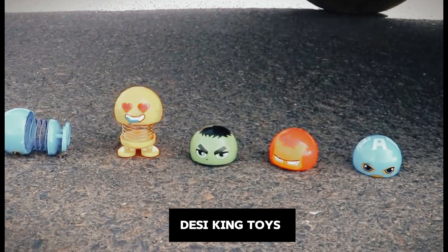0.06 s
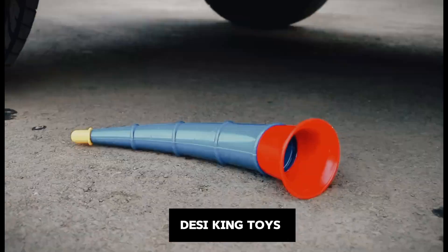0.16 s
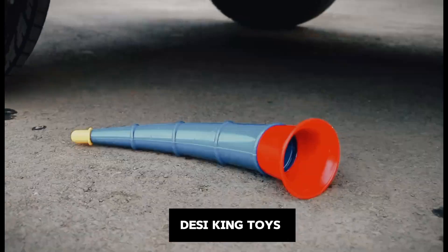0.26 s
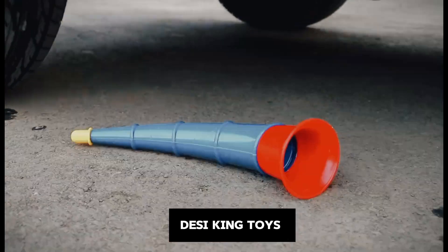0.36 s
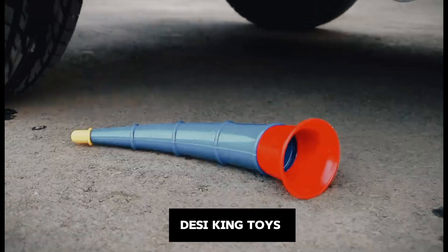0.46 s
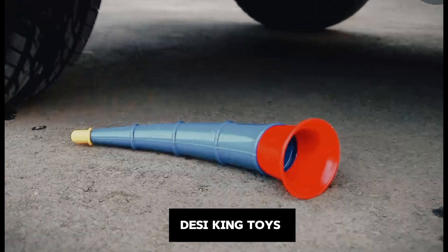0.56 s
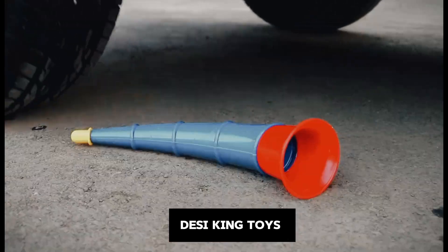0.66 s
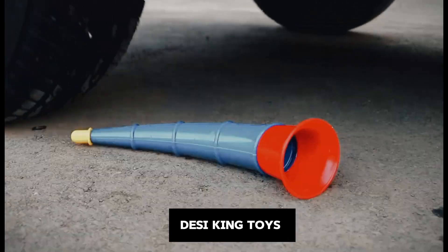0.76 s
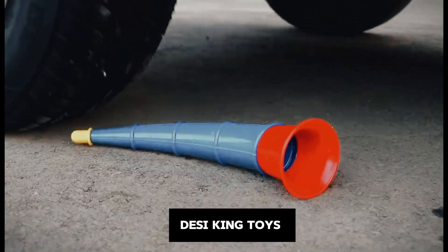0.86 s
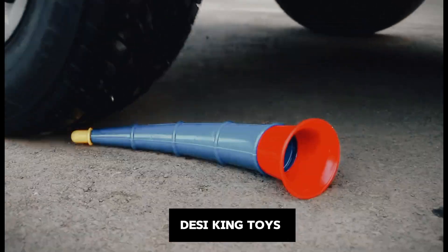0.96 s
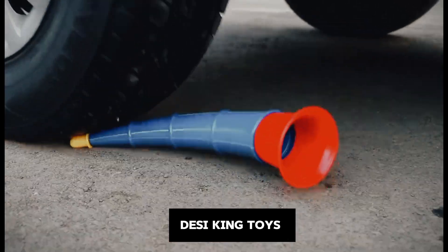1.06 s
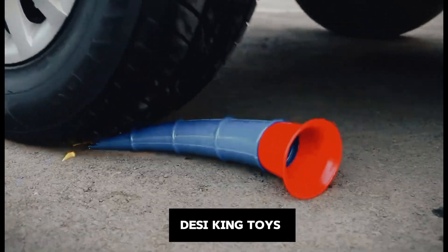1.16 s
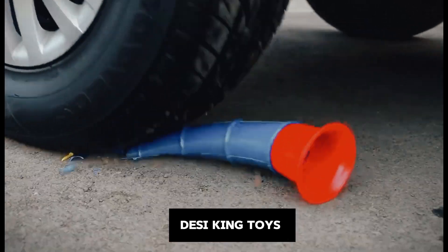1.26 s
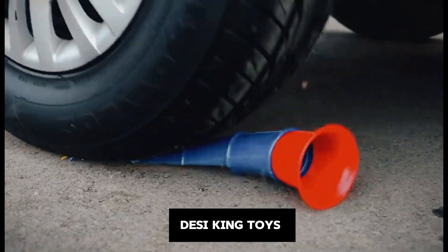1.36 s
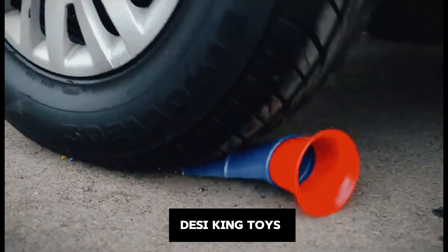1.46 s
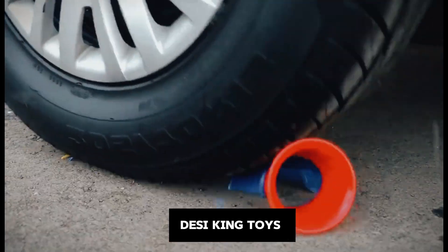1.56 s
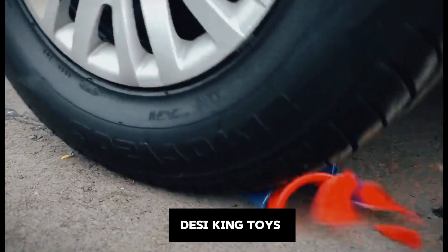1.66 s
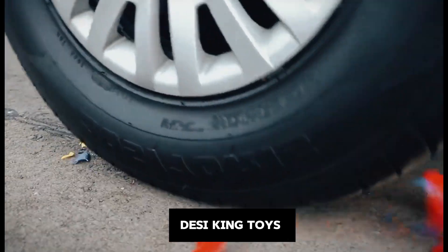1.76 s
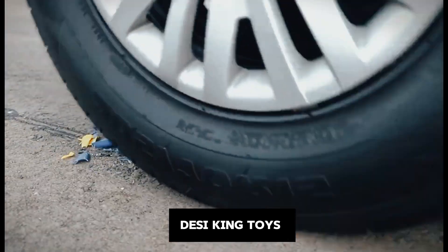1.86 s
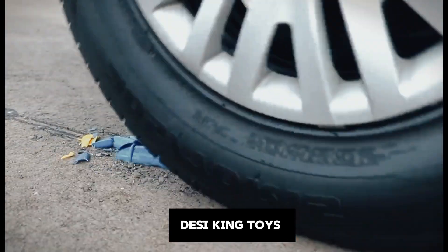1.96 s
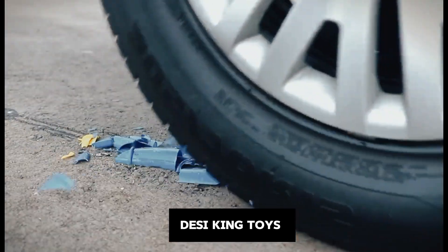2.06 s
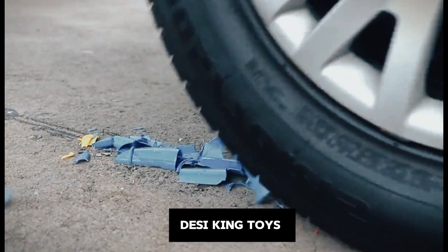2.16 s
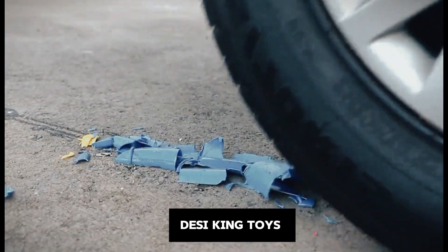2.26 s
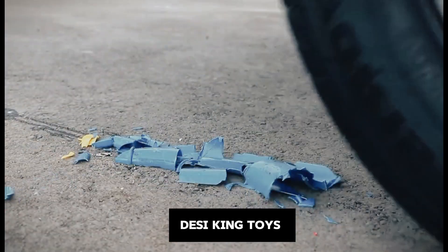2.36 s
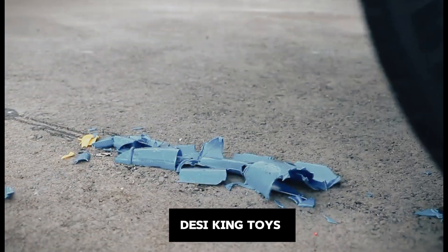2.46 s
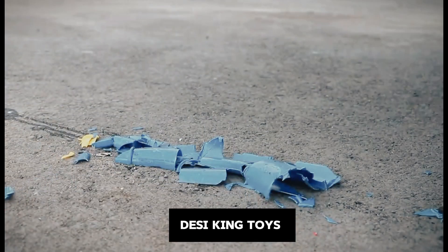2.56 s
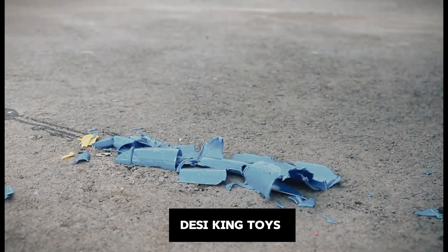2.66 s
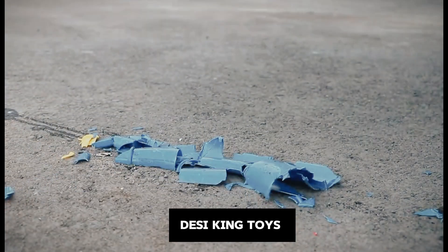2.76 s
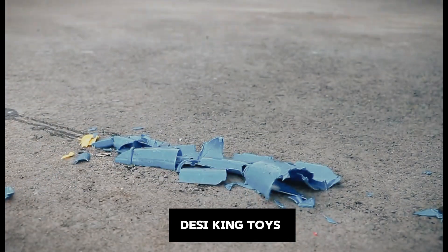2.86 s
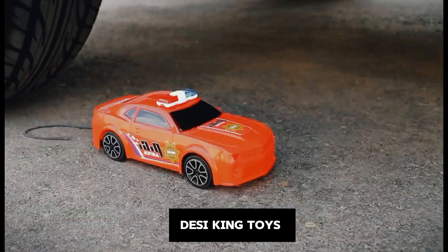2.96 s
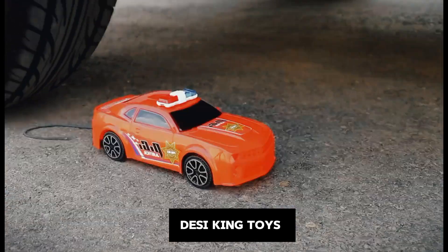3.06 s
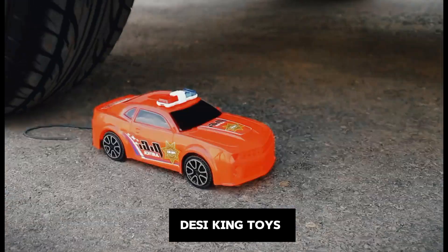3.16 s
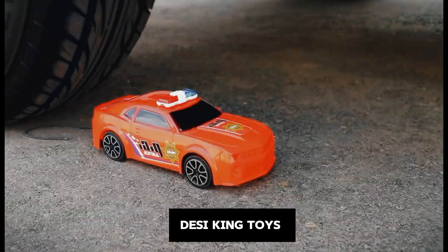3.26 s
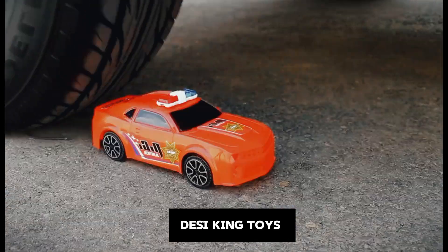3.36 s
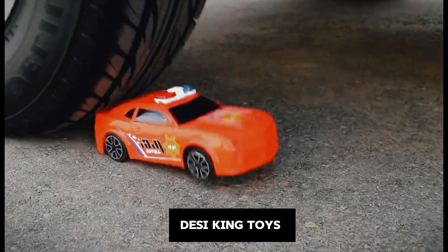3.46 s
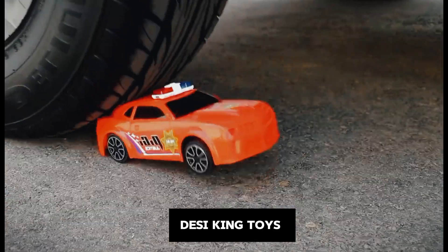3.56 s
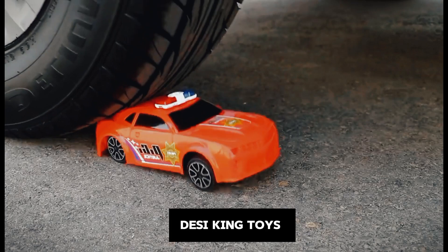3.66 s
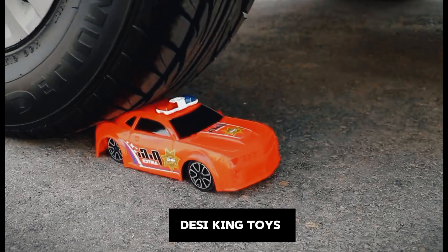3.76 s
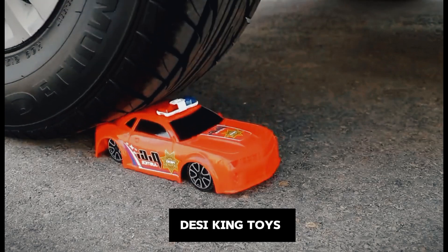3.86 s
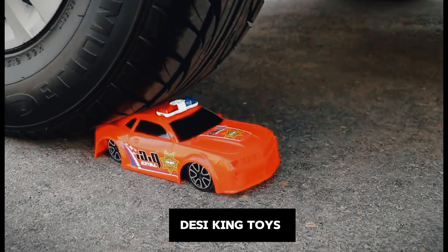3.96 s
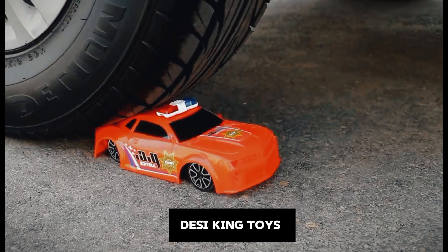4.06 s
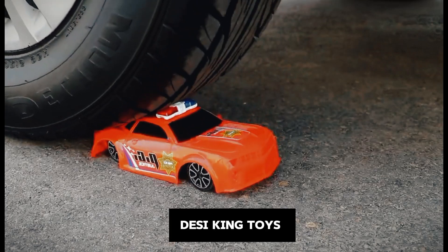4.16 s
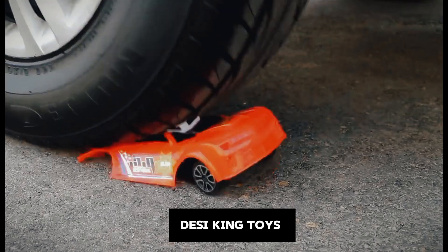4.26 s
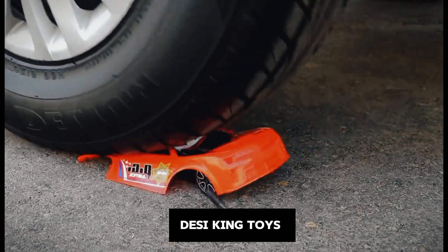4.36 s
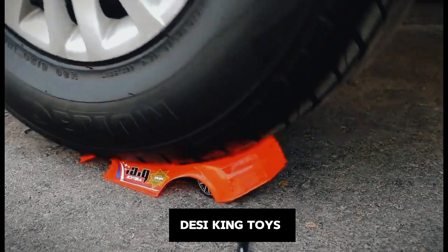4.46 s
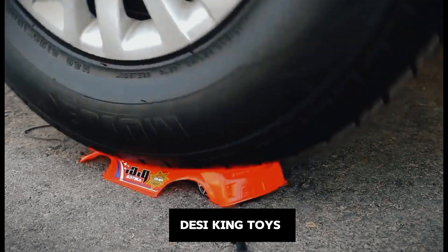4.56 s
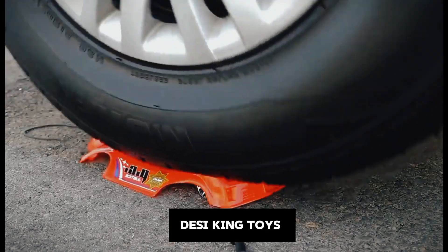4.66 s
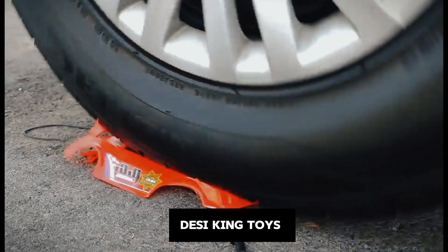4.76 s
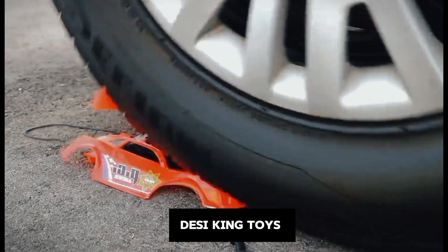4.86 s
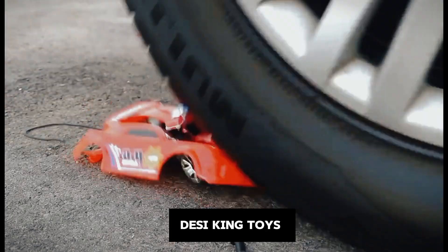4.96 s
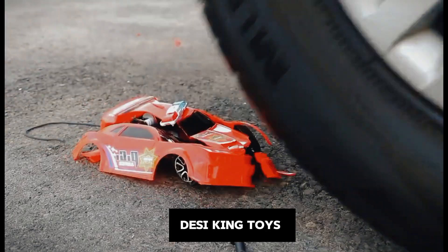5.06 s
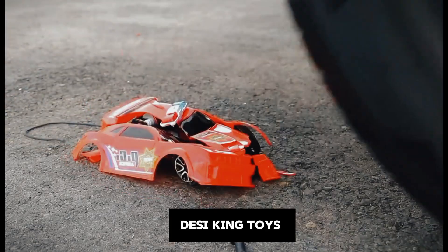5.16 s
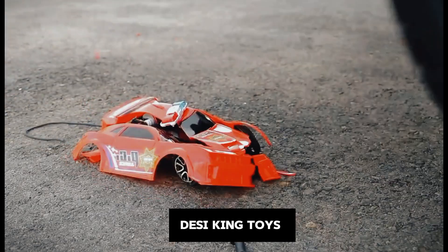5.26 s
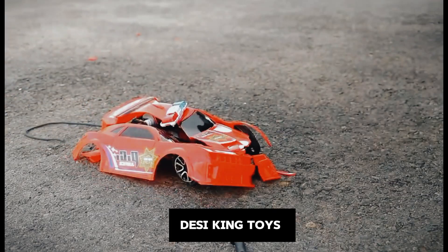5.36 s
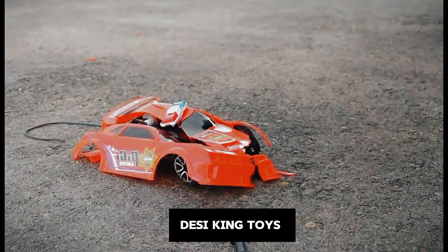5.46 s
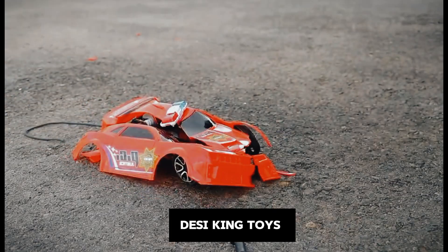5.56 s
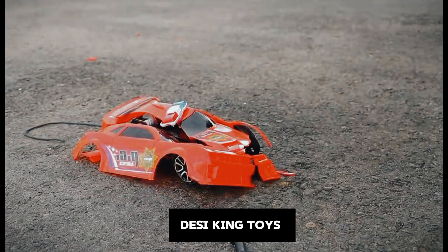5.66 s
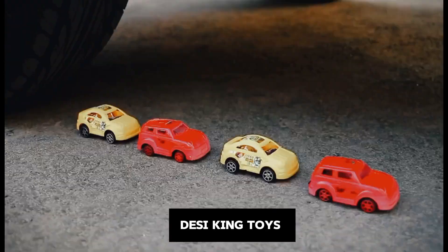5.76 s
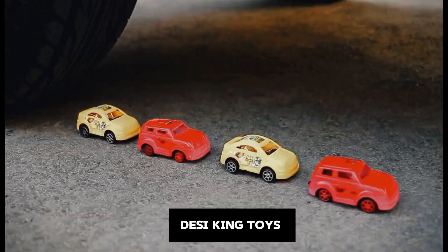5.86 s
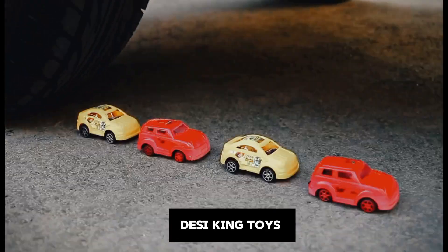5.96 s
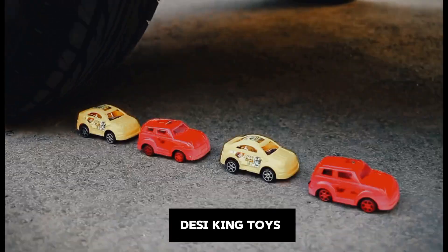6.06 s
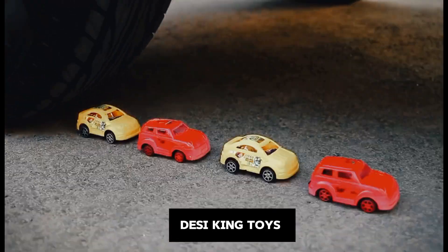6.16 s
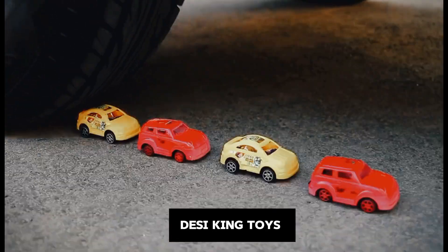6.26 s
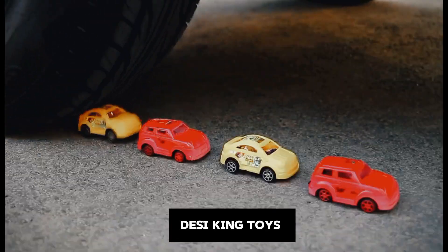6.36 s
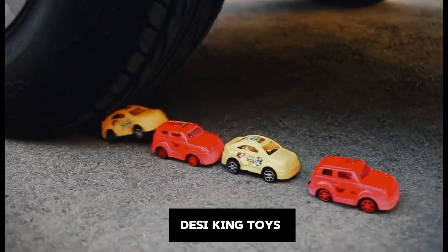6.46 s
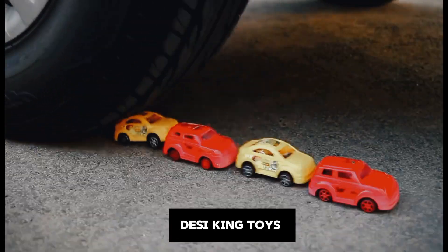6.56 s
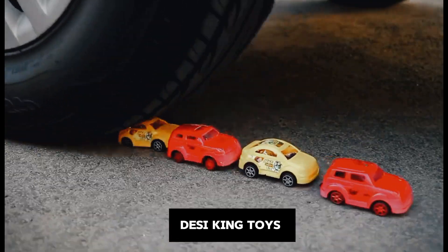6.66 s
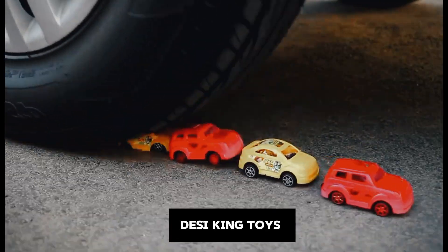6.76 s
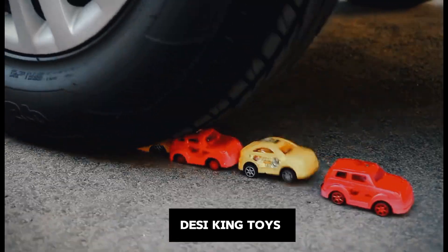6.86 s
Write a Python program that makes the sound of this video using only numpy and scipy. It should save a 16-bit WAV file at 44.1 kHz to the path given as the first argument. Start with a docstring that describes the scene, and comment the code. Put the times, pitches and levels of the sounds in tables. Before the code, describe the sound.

Close to the microphone, a car tyre rolls over plastic toys. A fading echo of an earlier crush comes first, then a hollow horn shatters in a dense crackling volley. A toy car creaks, buckles and caves in with darker crunches. After a quiet gap, small cars scrape and crack. The engine idles softly, with long, wide reverberation.

```python
"""A car tyre rolls over hollow plastic toys, close to the microphone: a horn shatters, a toy car creaks
and caves in, a small car cracks. Each break is a volley of tiny fractures ringing shell, splinters and ground.
Panels buckle with brief notes, low thuds and a rumble come from the tyre, and the engine idles softly below.
The close sounds sit in the centre with a long, wide reverberation around them; at the start the
reverberation of an earlier crush is still dying away."""
import sys
import numpy as np
from scipy import signal
from scipy.fft import rfft, irfft, next_fast_len
from scipy.io import wavfile
from scipy.ndimage import uniform_filter1d, map_coordinates

SR = 44100
rng = np.random.default_rng(int(sys.argv[2]) if len(sys.argv) > 2 else 0)


def transcribe(signal):
    """Save signal, clipped to [-1, 1], as a 16-bit WAV file at the path in sys.argv[1]."""
    frames = np.atleast_2d(signal).T
    limited = np.clip(frames, -1, 1)
    pcm = np.round(limited * 32767).astype(np.int16)
    wavfile.write(sys.argv[1], SR, pcm)


N = 304731  # samples

# Loudest single breaks, levels before the common gain in snaps():
# [t/s, length/s, shell f/Hz, shell level/dB, splinter f/Hz, splinter level/dB]
SNAP_EVENTS = [(1.2367, 0.025, 1510, -14.5, 5400, -11.5), (1.325, 0.0045, 911, -25, 5190, -16),
               (1.3555, 0.04, 750, -16, 5740, -14.5), (1.423, 0.013, 1370, -12, 2225, -27),
               (1.448, 0.027, 1493, -19.5, 2190, -15.5), (1.533, 0.013, 1188, -17, 5490, -15),
               (1.561, 0.0097, 1070, -16, 4680, -13.5), (1.6, .012, 1290, -18, 5500, -10.5),
               (1.682, 0.02, 374, -24, 5610, -12), (1.8188, 0.0045, 1196, -11.5, 4370, -12.5),
               (1.8247, 0.0038, 1478, -20, 5600, -10), (1.832, 0.012, 940, -18, 4930, -12),
               (1.874, 0.011, 1000, -18.5, 6600, -12.5), (1.888, .005, 740, -17, 5150, -17.5),
               (1.914, 0.0081, 730, -20.5, 4710, -15.5), (1.922, 0.0042, 810, -13.5, 5010, -13.5),
               (1.94, .0027, 714, -18, 5290, -14.5), (1.9684, 0.0046, 810, -18, 3900, -15),
               (2.0897, 0.0077, 1400, -26.5, 3530, -17.5), (2.135, 0.017, 770, -18.5, 5840, -17),
               (2.188, 0.0045, 777, -14, 5600, -16), (2.261, 0.0097, 890, -19, 2300, -16.5),
               (2.2855, 0.0023, 734, -24, 3380, -13.5), (2.301, 0.0072, 652, -17.5, 3920, -9.5),
               (2.315, 0.0032, 690, -16.5, 4760, -16), (2.351, .003, 1160, -34, 3800, -27),
               (2.8252, 0.0016, 770, -12, 8600, -11), (2.8903, .008, 894, -15, 3520, -19.5),
               (3.8784, 0.0029, 787, -36.5, 4200, -34.5), (4.098, 0.0036, 1370, -32.5, 2190, -39.5),
               (4.1737, 0.0013, 845, -27.5, 2850, -22.5), (4.3007, 0.007, 1470, -16.5, 3200, -13),
               (4.386, 0.0029, 1241, -18, 5010, -10), (4.391, 0.0056, 840, -13, 5000, -16),
               (4.413, 0.0054, 815, -18, 3600, -13), (4.502, 0.002, 840, -36, 2544, -16),
               (4.524, 0.0023, 760, -11.5, 2230, -13), (4.624, 0.0023, 833, -10, 3360, -9),
               (4.71, 0.0053, 1480, -15, 2250, -9), (4.773, 0.0031, 1280, -27, 5030, -14),
               (4.89, 0.00087, 387, -6.5, 6150, -10), (4.9117, 0.0036, 393, -9, 3520, -15.5),
               (4.987, 0.0069, 464, -43, 3000, -25.5), (5.1, 0.0071, 386, -29, 2230, -24),
               (5.1176, 0.009, 1230, -31, 2705, -30), (6.5697, 0.012, 390, -46, 2750, -34),
               (6.742, 0.012, 1070, -33.5, 3640, -26), (6.827, 0.0033, 656, -10, 3900, -7),
               (6.848, 0.0037, 706, -21, 6020, -14.5), (6.8923, 0.0043, 1510, -40, 2900, -14)]
# Separate scrunches where one wall folds, levels before the common gain in crunches():
# [t/s, length/s, shell f/Hz, shell level/dB, splinter f/Hz, splinter level/dB]
FOLDING_WALLS = [(1.193, 0.033, 656, -23, 5400, -10.5), (1.478, 0.042, 1080, -17.5, 2200, -18.5),
                 (1.605, 0.037, 1275, -19.5, 5095, -15), (1.759, .038, 1416, -21, 5160, -11),
                 (2.105, 0.026, 740, -29.5, 3910, -23), (2.237, 0.062, 1035, -26.5, 3680, -24),
                 (2.775, 0.027, 795, -32.5, 5200, -25), (3.852, 0.038, 835, -52, 4190, -43.5),
                 (4.127, .032, 600, -23.5, 2440, -24.5), (4.233, .012, 860, -11.5, 2490, -22),
                 (4.243, .025, 960, -21.5, 2225, -35), (4.321, .033, 704, -10.5, 5180, -13),
                 (4.44, .014, 800, -12.5, 2120, -10), (4.503, 0.028, 960, -18.5, 2200, -25.5),
                 (4.633, .034, 1380, -18.5, 2270, -20), (4.696, 0.029, 1264, -18.5, 2256, -19),
                 (4.895, 0.031, 390, -16, 2420, -22.5), (4.927, .105, 408, -31, 2620, -35.5),
                 (5.072, 0.048, 414, -40.5, 2240, -31.5), (6.753, 0.033, 1100, -22.5, 5030, -17.5),
                 (6.808, 0.064, 690, -33, 3900, -24)]
# What lies under the tyre, from each time on:
# [t/s, thump over shell level/dB, base sizzle over splinter level/dB, crack-tip resonance gain level/dB]
TOYS_UNDER_TYRE = [(0, -17, -2.5, -7.5), (2.65, -18, 2, 10.5), (3.4, -13, -2.5, -3), (6.1, -35.5, -3, -1)]
# How hard the tread presses on the horn: [t/s, load level/dB]
HORN_PRESSURE = [(1.25, -31.5), (1.34, -31), (1.375, -19), (1.41, -29), (1.44, -18.5), (1.74, -18),
                 (1.86, -23.5), (1.94, -27.5), (2.05, -38.5)]
# How hard the tread presses on the toy car: [t/s, load level/dB]
TOY_CAR_PRESSURE = [(4.28, -27.5), (4.34, -17), (4.42, -17), (4.47, -30), (4.72, -35), (4.85, -42.5),
                    (4.94, -33.5), (5.14, -39.5)]
# Panels that buckle, from a dull sag to a thin squeak:
# [middle t/s, width t/s, middle f/Hz, peak level/dB, glide/(octaves per s)]
BUCKLING_PANELS = [(1.206, 0.015, 4920, -12, 5), (1.686, 0.006, 165.1, -14.5, -2),
                   (2.788, 0.015, 4980, -23, -2), (3.671, 0.005, 847, -21.5, -0.5),
                   (4.064, 0.0016, 690, -15.5, 1.5), (4.145, 0.023, 630, -24.5, -2),
                   (4.142, 0.014, 2394, -20, -1), (4.178, 0.0027, 11530, -25.5, -7),
                   (4.205, 0.032, 354, -34, 2.5), (4.2395, 0.0049, 851, -5.5, 0.5),
                   (4.242, 0.014, 1106, -18.5, 0), (4.25, 0.019, 307.4, -22, -1),
                   (4.903, 0.013, 438, -9.5, 3.5), (4.915, 0.018, 285, -17.5, 0),
                   (4.913, 0.02, 154.4, -26, -0.5), (6.762, 0.0046, 1061, -13, 1)]
# The toy car's body creaking against the rubber: [t/s, ring f/Hz, typical level/dB]
CREAK_PATH = [(3.58, 813, -58.5), (3.594, 852, -33.5), (3.648, 1086, -42), (3.671, 857, -37.5),
              (3.70, 810, -46.5), (3.746, 853, -34), (3.79, 710, -50), (3.86, 866, -36.5),
              (3.905, 740, -55.5)]
# The tyre lurches or drops through a toy: [middle t/s, width t/s, level/dB]
TYRE_DROPS = [(.08, .13, -58), (1.69, 0.014, -27.5), (1.78, .04, -34), (3.78, 0.037, -47.5),
              (4.18, .11, -37.5), (4.345, 0.023, -35), (4.91, .015, -41)]
# Whine each time the car creeps forward: [middle t/s, width t/s, mean f/Hz, level before flutter/dB]
CREEP_WHINES = [(3.85, 0.025, 392, -49), (5.98, 0.16, 392, -57.5), (6.18, 0.13, 347, -52.5),
                (6.4, 0.15, 389, -58), (6.58, 0.065, 388, -47)]
# Relative spectrum of the engine rush: [f/Hz, level per Hz/dB]
ENGINE_SPECTRUM = [(35, -41.5), (60, -16), (224, -12), (390, -6.5), (491, -18), (679, -8), (744, -9.5),
                   (1390, -11.5), (1710, -18), (2360, -14), (5430, -31), (11400, -43.5), (15000, -35.5)]
# Relative spectrum of the grit under the tread: [f/Hz, level per Hz/dB]
GRIT_SPECTRUM = [(800, -19), (2500, -14.5), (5500, 2), (9000, -26.5), (11500, -25), (13000, -9.5),
                 (16000, -19.5)]
# Time for the reverberation to fall by 60 dB: [f/Hz, t/s]
REVERB_T60 = [(100, 2.1), (300, 2.12), (800, 2.25), (1840, 1.95), (4850, 1.106), (8800, 0.73),
              (12000, 0.74)]
# Relative colour of the reverberation: [f/Hz, level/dB]
REVERB_COLOUR = [(50, -7.5), (140, 1), (240, 1), (400, -1), (550, -4), (900, -3.5), (2000, -1), (3600, -4),
                 (5200, -0.5), (7200, -4), (8800, -1), (12000, -6), (15000, -3.5)]
# Resonances of the reverberation, start level before the wet gain: [f/Hz, level/dB]
REVERB_MODES = [(286, -64.5), (418, -61.5), (443, -60.5), (731, -59.5), (811, -56)]
# Relative spectrum of an earlier crush still ringing: [f/Hz, level per Hz/dB]
EARLIER_SPECTRUM = [(59, -42.5), (100, -16), (232, -31.5), (320, -25), (353, -19), (383, -11), (507, -36.5),
                    (671, -7.5), (1040, -10), (1750, -19.5), (2280, -31), (2620, -33), (3990, -32),
                    (4590, -42), (12000, -70.5), (15600, -95), (22000, -120)]

# Sizzle grows in dB per dB above a firm break, and in dB per octave above a typical splinter.
FIRM_DB, SIZZLE_GROWS = -10.5, 0.63
SPLINTER_HZ, SIZZLE_DB_PER_OCTAVE = 4730, 2
# A weak break is duller: top edge of a firm break (Hz), and the edge's shift (amplitude dB per dB).
DULL_HZ, DULL_GROWS = 14200, 0.19
# A wall crackles before it snaps: time constant (s) and share of the full force.
STRAIN_S, STRAIN_SHARE = .012, .09
# From this time (s) the car sounds louder: its levels step up, then keep rising at this rate (dB per s).
STEP_S, RISE_DB_PER_S = 5.85, 6
SCRAPE_SPAN = (6.1, 6.7)  # from, to (s)
TOP_HZ = 16000  # band limit


def snaps(gain_db=-0.5, crack=5.4):
    """A wall crackles under strain and gives way; the crack dies, and tyre and road throw a little back."""
    track, start = np.zeros(N), SR // 80
    t = (np.arange(SR // 14) - start) / SR
    straining = STRAIN_SHARE * np.exp(-np.abs(t) / STRAIN_S)
    thrown_back = np.exp(-np.abs(t) / .02)
    for s, length, *piece in SNAP_EVENTS:
        dying = np.exp(-np.abs(t) / (.5 * length)) + 0.12 * thrown_back
        envelope = np.where(t < 0, straining, dying)
        force = unit(fractures(len(t), rate=9000, spread_db=5)) * envelope
        force[start] += crack
        add(track, s + t[0], plastic(force, length, *voice(s, *piece)))
    return amp(gain_db) * track


def crunches(gain_db=-1.72, steepness=5.63, reach=0.53):
    """As the tread loads a wall, fractures swell and ebb in dense, uneven clumps."""
    track, clumps = np.zeros(N), amp(2.8 * wobble(170))
    t = np.arange(SR // 5) / SR
    middle = t[-1] / 2
    for s, length, *piece in FOLDING_WALLS:
        load = 1 / (1 + np.abs((t - middle) / (reach * length)) ** steepness)
        unevenness = np.resize(clumps[int(s * SR):], len(t))
        force = fractures(len(t), rate=4500, spread_db=1.5) * load * unevenness
        add(track, s + length / 2 - middle, plastic(force, length, *voice(s, *piece)))
    return amp(gain_db) * track


def crushes():
    """The brittle horn crumbles into bright splinters; the tougher toy car grinds more darkly."""
    horn = crush(HORN_PRESSURE, shell_hz=1120, splinter_hz=5050, splinter_db=3.0,
                 shell_octaves=0.75, splinter_octaves=0.37, uneven_db=-0.5, clump_db=2.0, ring=0.41)
    toy_car = crush(TOY_CAR_PRESSURE, shell_hz=828, splinter_hz=2620, splinter_db=-5.5,
                    shell_octaves=0.42, splinter_octaves=0.73, uneven_db=2.5, clump_db=0, ring=.9)
    return horn + toy_car


def crush(load, shell_hz, splinter_hz, splinter_db, shell_octaves, splinter_octaves,
          uneven_db, clump_db, ring):
    """One piece after another crumbles under the tread; each has its own size, and load sets its strength."""
    track, clumps, size = np.zeros(N), amp(clump_db * wobble(170)), SR // 25
    times, load_db = np.transpose(load)
    step = size / SR / 2  # s, so neighbouring pieces overlap by half
    pieces = rng.uniform(-1, 1, size=(int(1 / step), 3))
    for k, (shell, splinter, strength) in enumerate(pieces):
        s = times[0] + k * step
        pressure_db = np.interp(s + step, times, load_db, right=-np.inf).clip(-120)
        shell_db = pressure_db + uneven_db * strength
        piece_shell_hz = shell_hz * 2 ** (shell_octaves * shell)
        piece_splinter_hz = splinter_hz * 2 ** (splinter_octaves * splinter)
        force = fractures(size, rate=2800, spread_db=5) * np.sqrt(np.hanning(size))
        force = force * clumps[int(s * SR):][:size]
        piece = voice(s, piece_shell_hz, shell_db, piece_splinter_hz, shell_db + splinter_db)
        add(track, s, plastic(force, step, *piece, ring=ring))
    return track


def voice(s, shell_hz, shell_db, splinter_hz, splinter_db):
    """Thump follows the shell and sizzle the splinters; harder breaks and smaller splinters sizzle more."""
    _, thump_db, sizzle_db, tip_db = TOYS_UNDER_TYRE[sum(toy[0] <= s for toy in TOYS_UNDER_TYRE[1:])]
    sizzle_db += SIZZLE_GROWS * (splinter_db - FIRM_DB)
    sizzle_db += SIZZLE_DB_PER_OCTAVE * np.log2(splinter_hz / SPLINTER_HZ)
    return (shell_db + thump_db, shell_hz, shell_db, splinter_hz, splinter_db,
            splinter_db + sizzle_db, tip_db)


def plastic(force, length, thump_db, shell_hz, shell_db, splinter_hz, splinter_db, sizzle_db, tip_db, ring=1):
    """Force rings tyre and ground, hollow shell, stiff splinters and crack tips; pinned pieces ring less."""
    size = next_fast_len(len(force) + SR // 25)
    f = np.fft.rfftfreq(size, 1 / SR)
    thump = band(f, lo_hz=75, hi_hz=350) * (0.75 + mode(f, 245, q=1.6))
    shell = band(f, lo_hz=360, hi_hz=1630) * (0.12 + ring * mode(f, shell_hz, q=4.4))
    splinter = band(f, lo_hz=1900, hi_hz=6860) * (0.46 + ring * mode(f, splinter_hz, q=4.5))
    top_edge_hz = DULL_HZ * amp(DULL_GROWS * (splinter_db - FIRM_DB))
    splinter = splinter / (1 + (f / top_edge_hz) ** 4)
    sizzle = band(f, lo_hz=7700, hi_hz=17000) * (0.26 + amp(tip_db) * mode(f, 8800, q=4.6))
    # every piece has its own size, and so its own few sharp resonances
    piece = 1 + 1.2 * sum(mode(f, hz, q=38) for hz in 900 * 10 ** rng.random(size=7))
    parts = irfft(rfft(force, size) * piece * np.array([thump, shell, splinter, sizzle]), size)
    parts = parts / (np.linalg.norm(parts, axis=1, keepdims=True) + 1e-12)
    # each part's level is its rms if its energy were spread over the length
    return amp([thump_db, shell_db, splinter_db, sizzle_db]) @ parts * np.sqrt(length * SR)


def fractures(size, rate, spread_db):
    """Tiny random impulses of either sign, rate a second, with strengths scattered in dB."""
    chance, strength = rng.random(size), rng.standard_normal(size)
    push = rng.choice([-1, 1], size)
    return (chance < rate / SR) * push * amp(spread_db * strength)


def buckles(waver=0.029):
    """A panel flips through and swings at its own gliding, slightly unsteady pitch."""
    track, t = np.zeros(N), np.arange(-SR // 10, SR // 10) / SR
    drift = wobble(500)
    for s, width, hz, db, glide in BUCKLING_PANELS:
        unsteady = 1 + waver * np.resize(drift[int(s * SR):], len(t))
        pitch = hz * 2 ** (glide * t) * unsteady
        tone = np.sin(2 * np.pi * np.cumsum(pitch) / SR)
        add(track, s + t[0], amp(db) * np.exp(-(t / width) ** 2) * tone)
    return track


def creak(rate=100, decay=0.012, rasp_db=-19):
    """Plastic sticks and slips on rubber at an uneven rate; each slip rings the hollow body."""
    track, t = np.zeros(N), np.arange(SR // 30) / SR
    times, ring_hz, level = np.transpose(CREAK_PATH)
    slips = np.arange(times[0], times[-1], 1 / rate)
    for s, (late, detune, size) in zip(slips, rng.standard_normal((len(slips), 3))):
        swing = 2 * np.pi * np.interp(s, times, ring_hz) * (1 + 0.084 * detune) * t
        onset = 1 - np.exp(-t / 0.0005)
        ring = (np.sin(swing) + 0.14 * np.sin(2.3 * swing)) * onset
        hiss = filtered(rng.standard_normal(len(t)), lambda f: band(f, lo_hz=1090, hi_hz=3830) ** 2)
        rasp = amp(rasp_db) * unit(hiss)
        slip = unit((ring + rasp) * np.exp(-t / decay)) / np.sqrt(rate * t[-1])
        slip_db = np.interp(s, times, level) + 2 * size
        add(track, s + 0.09 * late / rate, amp(slip_db) * slip)
    return track


def scrapes(db=-54, count=14):
    """Small cars scrape on the asphalt as the tyre nears: resonant bursts up to the level db."""
    track, t = np.zeros(N), np.arange(SR // 20) / SR
    for when, pitch, size in rng.random((count, 3)):
        rub = fractures(len(t), rate=3600, spread_db=12.0) * np.hanning(len(t)) ** 2
        scrape = unit(filtered(rub, lambda f: mode(f, 2600 * 1.5 ** pitch, q=8.3) ** 2))
        add(track, np.interp(when, [0, 1], SCRAPE_SPAN), amp(db - 18.0 * size) * scrape)
    return track


def rumble(breaking, follow_db=-39, idle_db=-82, late_db=-63, settle=.08):
    """Low noise follows how strongly the toys give way under the tyre, and thuds where it drops."""
    low = unit(filtered(rng.standard_normal(N), lambda f: band(f, lo_hz=22, hi_hz=85)))
    # rms of the breaks over settle seconds
    shaking = np.sqrt(np.abs(uniform_filter1d(breaking ** 2, int(settle * SR))))
    floor = amp(np.where(np.arange(N) / SR < STEP_S, idle_db, late_db))
    rolling = (floor + amp(follow_db) * shaking) * amp(0.83 * wobble(11.0))
    thuds = sum(amp(db) * swell(s, width) for s, width, db in TYRE_DROPS)
    return low * (rolling + thuds)


def grit(early_db=-85, late_db=-69.5):
    """Small impulses of grit under the tread, coloured and unsteady in level."""
    ticks = unit(filtered(fractures(N, rate=2000, spread_db=1), lambda f: amp(along(GRIT_SPECTRUM, f))))
    return ticks * amp(car_level(early_db, late_db) + 1.5 * wobble(20))


def whine():
    """A soft tone, wavering in pitch and level, swells each time the car creeps forward."""
    track, flutter = np.zeros(N), amp(3 * wobble(22))
    turns = np.cumsum(1 + 0.0455 * wobble(70)) / SR  # wavering time for the phase
    for s, width, hz, db in CREEP_WHINES:
        tone = np.sqrt(2) * np.sin(2 * np.pi * hz * turns)
        track += amp(db) * swell(s, width) * flutter * tone
    return track


def engine(early_db=-60, late_db=-53):
    """The idling engine is a rush of coloured noise with a slightly unsteady level."""
    rush = unit(filtered(rng.standard_normal(N), lambda f: amp(along(ENGINE_SPECTRUM, f))))
    return rush * amp(car_level(early_db, late_db) + 0.87 * wobble(11))


def car_level(early_db, late_db):
    """Level in dB: steady at early_db, then stepping to late_db at STEP_S and rising."""
    since = np.arange(N) / SR - STEP_S
    return np.where(since < 0, early_db, late_db + RISE_DB_PER_S * since)


def hall(x, wet_db=-11.0, delay=0.033, build=0.02):
    """The reverberation sets in late, swells as its echoes thicken, and hums in a few resonances."""
    response = tail(REVERB_COLOUR)
    t = np.arange(response.shape[1]) / SR
    for hz, db in REVERB_MODES:
        # a quarter turn apart in left and right
        phase = 2 * np.pi * rng.random() + np.array([[0], [np.pi / 2]])
        decay = amp(db - 60 * t / along(REVERB_T60, hz))
        response = response + decay * np.sin(2 * np.pi * hz * t + phase)
    response = response * np.clip((t - delay) / build, 0, 1)
    return amp(wet_db) * signal.fftconvolve(x[None], response, axes=1)[:, :N]


def earlier_crush(db=-37):
    """Only the reverberation of an earlier crush is left, dying away."""
    ring = tail(EARLIER_SPECTRUM)
    ring = ring / np.std(ring[:, :SR // 10])  # db is the level of the first 0.1 s
    return amp(db) * np.pad(ring, ((0, 0), (0, N - ring.shape[1])))


def tail(colour):
    """A stereo noise tail, left channel at energy 1, in which the treble dies first."""
    hz, t, z = signal.stft(rng.standard_normal((2, 2 * SR)), SR, nperseg=512)
    decay_db = 60 * t / along(REVERB_T60, hz)[:, None]
    gain = amp(along(colour, hz)[:, None] - decay_db)
    mid, side = signal.istft(z * gain, SR, nperseg=512)[1]
    pair = np.array([mid + 0.77 * side, mid - 0.8 * side])
    return pair / np.linalg.norm(pair[0])


def amp(db):
    """Decibels to gain."""
    return 10 ** (np.asarray(db) / 20)


def unit(x):
    """x at rms 1."""
    return x / np.sqrt(np.mean(x ** 2) + 1e-20)


def along(points, hz):
    """Interpolate (Hz, value) points on a log frequency axis."""
    f, v = np.transpose(points)
    return np.interp(np.log(hz + 1), np.log(f + 1), v)


def wobble(rate):
    """A smooth random curve, rate knots a second."""
    knots = rng.standard_normal(int(N * rate / SR) + 4)
    return map_coordinates(knots, [np.arange(N) * rate / SR])


def swell(s, width):
    """A bell-shaped rise and fall around time s."""
    return np.exp(-np.minimum(((np.arange(N) / SR - s) / width) ** 2, 50))


def filtered(x, response):
    """x times a response of frequency."""
    m = next_fast_len(x.shape[-1] + SR // 4)
    return irfft(rfft(x, m) * response(np.fft.rfftfreq(m, 1 / SR)), m)[..., :x.shape[-1]]


def band(f, lo_hz, hi_hz):
    """Causal band-pass with third-order skirts."""
    up, down = 1j * f / lo_hz, 1j * f / hi_hz
    poles = lambda s: (s + 1) * (s * s + s + 1)
    return up * up * up / (poles(up) * poles(down))


def mode(f, hz, q):
    """One causal resonance, gain 1 at its centre."""
    return 1j * f * hz / q / (hz * hz - f * f + 1j * f * hz / q)


def add(track, s, sound):
    """Mix a sound into the track at time s."""
    part = track[max(round(s * SR), 0):][:len(sound)]
    part += sound[:len(part)]


def scene():
    """The close sounds sit in the centre, the reverberation spreads around them."""
    breaking = snaps() + crunches() + crushes()
    toys = breaking + buckles() + creak() + scrapes()
    car = rumble(breaking) + grit() + whine() + engine()
    close = toys + car
    return close + hall(close) + earlier_crush()


def record(dry):
    """The loudest peaks are rounded off below full scale; a steep filter cuts above the band limit."""
    rounded = dry / (1 + np.abs(dry / .97) ** 5) ** (1 / 5)
    return filtered(rounded, lambda f: 1 / (1 + (f / TOP_HZ) ** 150))


dry = scene()
out = record(dry)
transcribe(out)
```